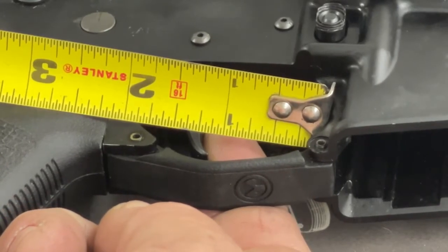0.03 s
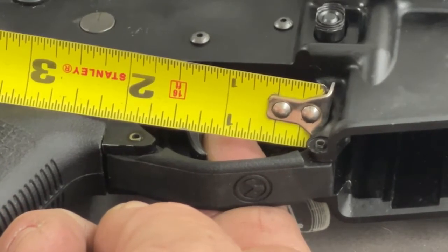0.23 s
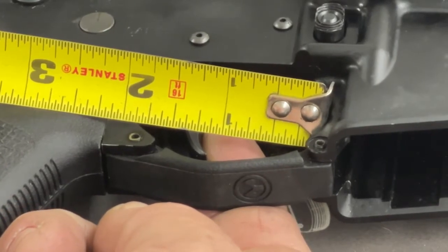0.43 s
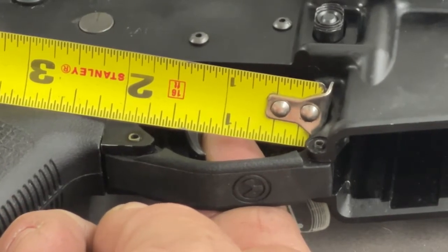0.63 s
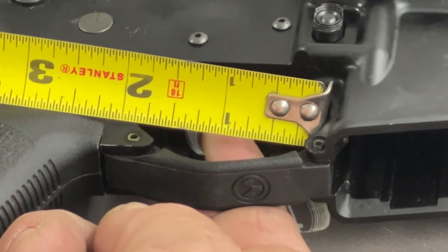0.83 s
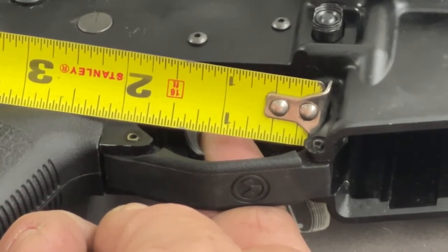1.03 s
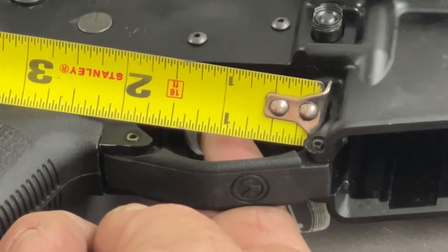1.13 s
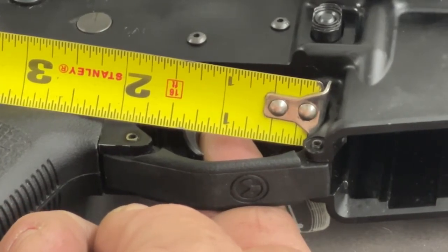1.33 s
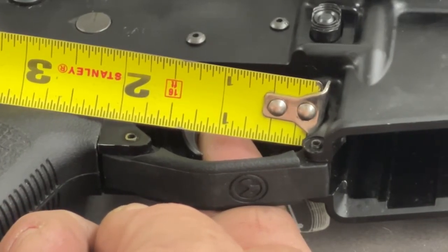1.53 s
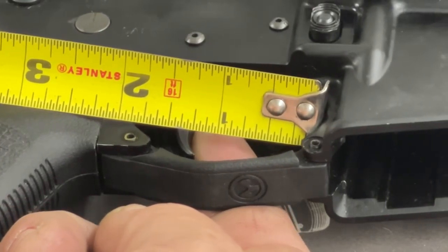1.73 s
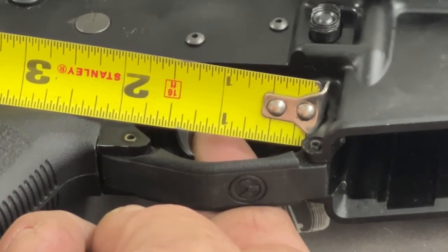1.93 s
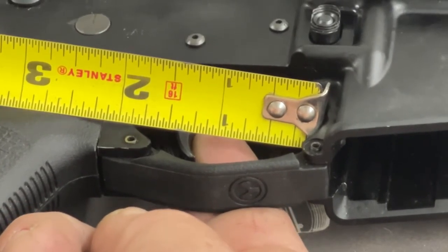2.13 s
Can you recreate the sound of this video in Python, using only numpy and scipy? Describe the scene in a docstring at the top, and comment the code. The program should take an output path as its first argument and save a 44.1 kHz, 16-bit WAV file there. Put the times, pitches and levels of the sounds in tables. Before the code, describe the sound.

A rifle trigger is dry-fired close to the microphone in a quiet small room; a light metallic click comes first, then over a second later a violent hammer snap overloads the microphone and briefly echoes.

```python
"""First comes soft ventilation noise with a slightly wavering mains hum, in a small room.
Then a rifle trigger is dry-fired close to the microphone: it takes up its slack with a small click.
Later the sear lets go and the hammer slams into the receiver and bounces.
Each metal contact is a crack of noise plus decaying sine waves; soft thuds are single sines.
The snap overloads the microphone, and echoes of decaying noise ring on in the room."""
import sys
import numpy as np
from scipy import signal
from scipy.fft import rfft, irfft
from scipy.io import wavfile

SR = 44100
rng = np.random.default_rng(int(sys.argv[2]) if len(sys.argv) > 2 else 0)


def materialize(psi):
    """Save the field psi as 16-bit PCM at rate SR to the path in sys.argv[1].

    A 1-D psi becomes a single channel; in a 2-D psi each row is a channel.
    """
    bounded = np.clip(np.atleast_2d(psi).T, -1, 1)
    quanta = np.round(bounded * 32767).astype(np.int16)
    wavfile.write(sys.argv[1], SR, quanta)


N = 96975

# Spectrum shape of the ventilation noise: f/Hz, relative level per Hz/dB
AIR_SPECTRUM = [(20, 18.5), (40, -3), (80, -3), (140, -5.5), (300, -8), (450, -5), (700, -6), (1000, -7.5),
                (2200, -12), (3300, -15.5), (5000, -23), (8000, -28.5), (15000, -36.5)]
# Hum tones: f/Hz, rms level before wavering/dB
HUM_TONES = [(59.8, -59), (100, -75), (198.5, -78.5), (298, -82), (396.5, -76.5)]
# Spectrum shape of the room echo: f/Hz, relative level/dB
ROOM_SPECTRUM = [(100, -8.5), (300, -2), (600, 11), (1200, 0), (3000, -3.5), (6300, 0), (10000, 1.5),
                 (16000, -1.5)]
# How long the room echo takes to fall by 60 dB: f/Hz, t60/s
ROOM_DECAY = [(100, 0.38), (700, .35), (2000, 0.4), (4000, 0.39), (6000, 0.36), (9000, .29), (15000, 0.25)]
# Soft knocks of hand and stock: t/s, starting level/dB, f/Hz, t60/s
SOFT_KNOCKS = [(0.41, -37, 166, 0.038), (0.44, -50, 283, 0.108), (1.718, -28.5, 260, .05),
               (1.737, -31.5, 95, .045), (1.962, -45.5, 1000, 0.017)]
# Trigger clicks: t/s, relative level/dB
TRIGGER_CLICKS = [(0.32, -39), (.325, -46), (.4055, -36.5), (0.4065, -26), (0.413, 2.5), (0.415, -4)]
# Ringing tones (modes) of the trigger: f/Hz, relative level/dB, t60/s
TRIGGER_TONES = [(800, -12, .03), (1150, -23, .1), (1740, -6, .039), (1930, -4, .034), (2155, -6, .03),
                 (3030, -10, .025), (4180, -6, .028), (5470, -5, .012), (6540, -12, .02), (7040, -8, .014),
                 (8500, -12, .014), (12400, -17, .013)]
# Spectrum shape of the trigger's crack: f/Hz, relative level per Hz/dB
TRIGGER_CRACK_SPECTRUM = [(100, -27), (500, -10.5), (1200, -11.5), (2000, -8), (3500, -4), (6000, -1),
                          (9000, -8.5), (11000, -18.5), (16000, -26.5)]
# Hammer action (sear creep, release, fall, bounces):
# t/s, relative level/dB, low-pass f/Hz (lower is duller), ring length as a share of the full length
HAMMER_BLOWS = [(1.7079, -31.5, 1998, .4), (1.7098, 0, 2415, 0.56), (1.7155, 7, 13180, 0.9),
                (1.7182, 0, 9000, 0.91), (1.7237, -1, 12000, 1), (1.7305, -16.5, 9000, .8),
                (1.7395, -18.5, 9000, .8)]
# Ringing tones of receiver and hammer: f/Hz, relative level/dB, t60/s before the share above
RECEIVER_TONES = [(820, -3, .05), (1423, -7, .05), (1830, -3, .05), (2036, -4, .06), (2288, -6, .06),
                  (3027, -7, .05), (3313, -4, .05), (3606, -1, .05), (4130, -3, .05), (4280, -2, .05),
                  (4948, -2, .06), (5425, -4, .05), (5803, 1, .05), (6220, -5, .05), (6565, -4, .06)]
# Spectrum shape of the receiver's crack: f/Hz, relative level per Hz/dB
RECEIVER_CRACK_SPECTRUM = [(100, -24), (300, -25), (660, -26.5), (950, -9.5), (1300, -6.5), (2000, -4),
                           (3800, 2), (6300, 2), (8500, -8.5), (12000, -12.5), (16000, -20)]

AIR_DB = -67  # rms of the air noise above 500 Hz
HUM_WAVER_DB = 1.5  # typical random swing of a 200 Hz tone
ROOM_DELAY_S, ROOM_BUILD_S = .004, 0.002  # wait before the echo, time constant of its rise
CLICK_ROOM_DB, SNAP_ROOM_DB = -20.5, -11  # sent into the echo
# Levels relative to each click or blow; the last is the crack's t60
TRIGGER_RING_DB, TRIGGER_CRACK_DB, TRIGGER_CRACK_S = -27, -23.5, .016
RECEIVER_RING_DB, RECEIVER_CRACK_DB, RECEIVER_CRACK_S = -19.5, 0.5, 0.029  # t60 at full length
CLIP_LEVEL, BIAS_SHIFT_DB, BIAS_RETURN_HZ = .92, -3, 3
TOP_HZ = 15800  # upper limit of the microphone
T = np.arange(N) / SR  # time in s
FREQS = np.fft.rfftfreq(N, 1 / SR)  # in Hz


def undb(db):
    """Turn decibels into a plain multiplier."""
    return 10 ** (np.asarray(db) / 20)


def curve(points, hz):
    """Read a table between its points, on a log-frequency axis."""
    p = np.array(points, float)
    return np.interp(np.log(np.maximum(hz, 1)), np.log(p[:, 0]), p[:, 1])


def colour(x, points):
    """Shape a sound's spectrum with unit power gain and no response before the input."""
    gain = undb(curve(points, FREQS))
    gain = gain / np.sqrt(np.mean(gain ** 2))
    # Folding the cepstrum (transform of the log gain) puts the filter's energy early
    cepstrum = irfft(np.log(gain), N)
    cepstrum[1:N // 2] *= 2
    cepstrum[N // 2:] = 0
    impulse = irfft(np.exp(rfft(cepstrum)), N)[:N // 20]
    return signal.fftconvolve(x, impulse)[:N]


def butter(x, hz, kind, order):
    """Remove the lows or the highs with a smooth Butterworth filter."""
    sos = signal.butter(order, min(hz, SR / 2 - 1), kind, fs=SR, output="sos")
    return signal.sosfilt(sos, x)


def fade(t60):
    """Die away exponentially, by 60 dB in t60 seconds."""
    return np.exp(-np.log(1000) * T / t60)


def at(x, start):
    """Delay a sound so that it begins at start, in seconds."""
    return np.concatenate([np.zeros(int(start * SR)), x])[:N]


def strike(modes, ring_db, crack_colour, crack_db, crack_s, length=1):
    """One metal contact: a dense short crack and the ringing modes of the part."""
    ring = np.zeros(N)
    for k, (hz, db, t60) in enumerate(modes):
        sign = (-1) ** k  # neighbouring tones start in opposite directions
        ring += sign * undb(db) * fade(t60 * length) * np.sin(2 * np.pi * hz * T)
    noise = rng.choice([-1, 1], N) * fade(crack_s * length)
    crack = colour(noise, crack_colour)
    return undb(ring_db) * ring + undb(crack_db) * crack


def background():
    """Soft ventilation noise, which is shaped random noise, and a slightly wavering hum of sines."""
    air = irfft(rfft(rng.standard_normal(N)) * undb(curve(AIR_SPECTRUM, FREQS)), N)
    air *= undb(AIR_DB) / np.std(butter(air, 500, "high", order=4))
    out = air
    knots = np.linspace(0, T[-1], 12)
    for hz, db in HUM_TONES:
        # Higher tones waver more, up to twice the setting
        swing_db = HUM_WAVER_DB * min(hz / 200, 2)
        waver = np.interp(T, knots, rng.standard_normal(len(knots))) * swing_db
        tone = np.sin(2 * np.pi * (hz * T + rng.random()))
        out = out + np.sqrt(2) * undb(db + waver) * tone  # root 2 turns rms into peak
    return out


def room():
    """Diffuse echo of the small room: noise in quarter-octave bands, where the treble dies first."""
    noise = rfft(rng.standard_normal(N))
    # Everything below about 400 Hz shares the lowest band
    band = np.round(4 * np.log2(np.clip(FREQS, 400, TOP_HZ))) / 4
    tail = np.zeros(N)
    for b in np.unique(band):
        tail += irfft(noise * (band == b), N) * fade(curve(ROOM_DECAY, 2 ** b))
    rising = tail * (1 - np.exp(-T / ROOM_BUILD_S))
    echo = at(colour(rising, ROOM_SPECTRUM), ROOM_DELAY_S)
    return echo / np.sqrt(np.sum(echo ** 2))  # unit total energy


def knocks():
    """Damped thuds of the rifle in the hand, each one a fading sine."""
    out = np.zeros(N)
    for start, db, hz, t60 in SOFT_KNOCKS:
        thud = fade(t60) * np.sin(2 * np.pi * hz * T)
        out += at(undb(db) * thud, start)
    return out


def trigger():
    """The trigger creeps, then clicks against its stop; each contact makes its metal ring."""
    out = np.zeros(N)
    for start, db in TRIGGER_CLICKS:
        click = strike(TRIGGER_TONES, TRIGGER_RING_DB,
                       TRIGGER_CRACK_SPECTRUM, TRIGGER_CRACK_DB, TRIGGER_CRACK_S)
        out += at(undb(db) * click, start)
    return out


def hammer():
    """The sear slips; the hammer hits the receiver and bounces, with each contact dulled its own way."""
    out = np.zeros(N)
    for start, db, dull_hz, length in HAMMER_BLOWS:
        blow = strike(RECEIVER_TONES, RECEIVER_RING_DB,
                      RECEIVER_CRACK_SPECTRUM, RECEIVER_CRACK_DB, RECEIVER_CRACK_S, length)
        out += at(undb(db) * butter(blow, dull_hz, "low", order=1), start)
    return out


def scene():
    """Add the direct sounds, their echo in the room and the background."""
    click = trigger() + knocks()
    snap = hammer()
    echo = room()
    sent_to_room = undb(CLICK_ROOM_DB) * click + undb(SNAP_ROOM_DB) * snap
    wet = signal.fftconvolve(sent_to_room, echo)[:N]
    return (click + snap + wet + background())[None]


def record(dry):
    """The microphone clips; overload pushes its bias aside, which swings back as a low thump."""
    clipped = np.clip(dry, -CLIP_LEVEL, CLIP_LEVEL)
    overload = 1. * (np.abs(dry) > CLIP_LEVEL)  # 1 while too loud, otherwise 0
    pushed = butter(overload, BIAS_RETURN_HZ, "low", order=1)
    bias = butter(pushed, BIAS_RETURN_HZ, "high", order=2)
    out = clipped - undb(BIAS_SHIFT_DB) * bias
    # Cut the top steeply; filtering both ways adds no delay
    top_cut = signal.ellip(8, .1, 50, TOP_HZ, fs=SR, output="sos")
    return signal.sosfiltfilt(top_cut, out)


dry = scene()
out = record(dry)
materialize(out)
```